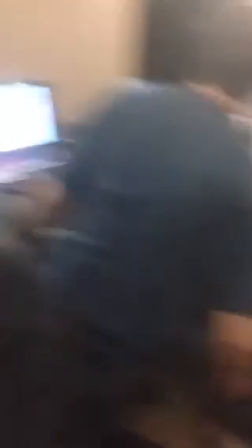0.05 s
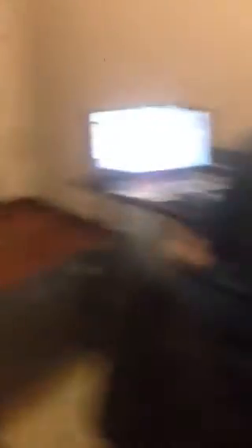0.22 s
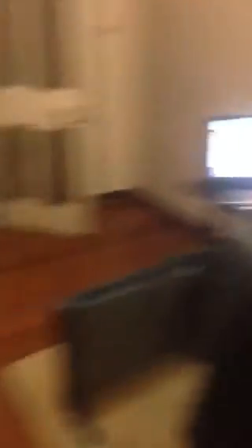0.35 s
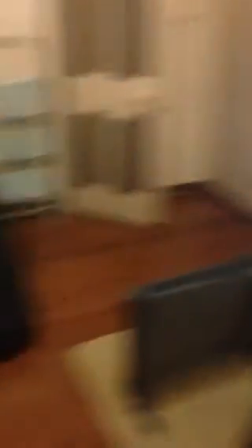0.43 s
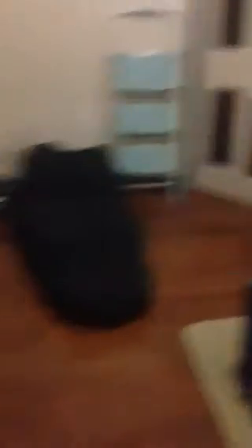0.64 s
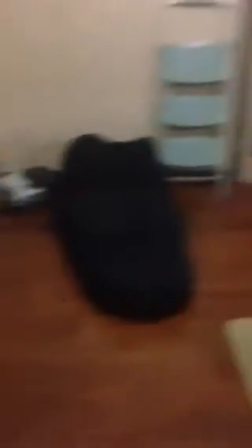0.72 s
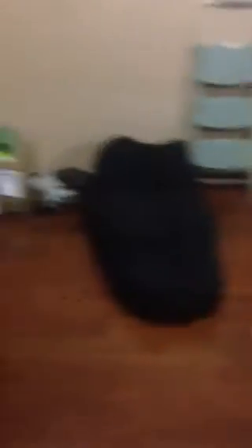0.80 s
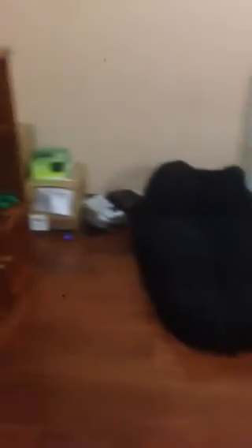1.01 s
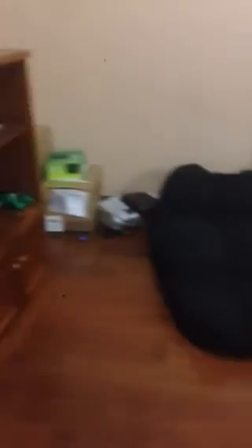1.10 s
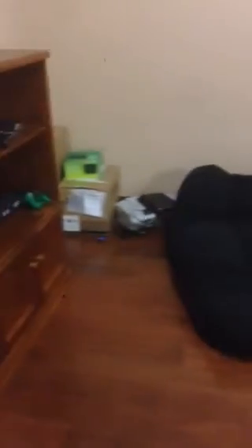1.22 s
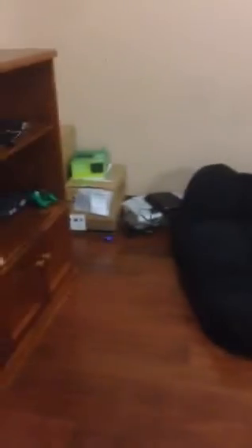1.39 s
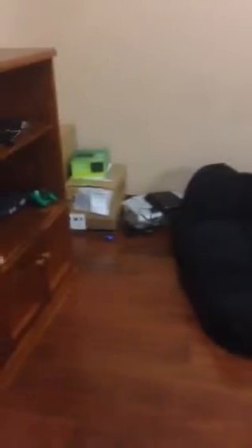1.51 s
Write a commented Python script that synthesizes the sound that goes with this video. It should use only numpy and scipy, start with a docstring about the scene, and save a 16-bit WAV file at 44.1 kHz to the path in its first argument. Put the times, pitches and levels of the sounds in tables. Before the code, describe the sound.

Hard knocks on wood, then a small object bouncing twice on a wooden floor.

```python
"""A bare room with a wooden floor, heard through one microphone. Three hard knocks sound on wood,
the last hollow and rattling; a small hard object then bounces twice with bright clicks. Duller taps come
from farther off, with soft thuds like footfalls, over faint room noise; early on, the microphone's case
is lightly bumped. Every contact is very short: most of what one hears is the room ringing after it."""
import sys
import numpy as np
from scipy import signal
from scipy.fft import rfft, irfft, next_fast_len
from scipy.io import wavfile
from scipy.ndimage import uniform_filter1d

SR = 44100
rng = np.random.default_rng(int(sys.argv[2]) if len(sys.argv) > 2 else 0)


def inscribe(sig):
    """Save sig as 16-bit PCM at rate SR to the path in sys.argv[1].

    A 1-D sig is mono; a 2-D sig holds one channel per row.
    Samples are clipped to [-1, 1] before scaling.
    """
    pcm = np.round(np.clip(np.atleast_2d(sig).T, -1, 1) * 32767)
    wavfile.write(sys.argv[1], SR, pcm.astype(np.int16))


N = 68355

# the floor's low answer to a bounce or a tap: frequency_hz, level_db
FLOOR_SPECTRUM = [(40, -28.5), (130, -17), (400, -12.5), (580, -15.5), (740, -34), (1400, -39), (5000, -66)]
PIVOT_HZ = 5100  # spectral tilts turn about this frequency


def knocks():
    """Hard blows on wood: each has a body, a crack, a bright resonance and ringing modes."""
    # the last four blows make one rattling knock: start_s, body_db, low_edge_hz, high_edge_hz,
    # crack_db, tilt_db_per_octave, bright_db, direct_db, board_db, hollow_db
    blows = [(0.202, 9, 256, 1530, 3.5, -2.5, -27, -17, -40.5, -73),
             (.3075, 18, 105.4, 1008, 4, 0, 8.5, -12.5, -31.5, -67),
             (.566, 2, 172, 556, -2, -3.5, 4, -13.5, -73, -36),
             (0.5711, -12, 227, 2360, 0, 5, -17, 0, -81, -55),
             (.577, -16, 298, 2300, -7.5, -3.5, -6, 0, -56, -65),
             (.614, 0.5, 200, 544, -23, -10, -26, -6, -69, -36.5)]
    # the crack of the wood: frequency_hz, level_db
    crack_spectrum = [(100, -29.5), (700, -6), (1650, -3), (2150, -1), (2700, -12), (3400, -3.5),
                      (4400, -4), (7300, -4.5), (10000, -12), (12500, -13), (15000, -25)]
    # modes of the boards and of a hollow wooden body: pitch_hz, level_db, t60_s
    board_modes = [(158.3, 3, 0.29), (190, -1.5, 0.4), (336, -2, 0.19), (494, 1.5, 0.41), (566.5, -2, 0.27),
                   (734, -6, 0.15), (718, -21, 0.57), (1010, -16, 0.43), (967, 1, 0.21), (2880, -10, 0.37),
                   (3542, -7, 0.24), (3650, -8, 0.47)]
    hollow_modes = [(188.5, -14, 0.44), (251.4, -5.5, 0.27), (408.5, 3, 0.33), (432.4, 5.5, 0.18),
                    (609.6, -5, 0.32), (1326, -6, 0.13), (2050, -9, 0.26), (2640, -4, 0.081),
                    (7050, -4.5, 0.09)]
    bright_hz, half_width_octaves = 2820, 0.44
    out, f = np.zeros(N), grid() + 1
    for s, body_db, low_hz, high_hz, crack_db, tilt, bright_db, direct_db, board_db, hollow_db in blows:
        body = amp(body_db) / np.hypot(1, (f / high_hz) ** 6)
        crack = shape(crack_spectrum) * amp(crack_db + tilt * np.log2(f / PIVOT_HZ))
        bright = amp(bright_db) / np.hypot(1, (np.log2(f / bright_hz) / half_width_octaves) ** 4)
        low_cut = 1 / np.hypot(1, (low_hz / f) ** 5.1)
        strike = contact(np.sqrt(body ** 2 + crack ** 2 + bright ** 2) * low_cut, direct_db)
        boards = amp(board_db) * ring(board_modes, low_hz)
        hollow = amp(hollow_db) * ring(hollow_modes)
        add(out, s, strike + boards + hollow)
    return out


def bounces():
    """A small object clicks on the floor and rings faintly; each contact has its own brightness."""
    # its contacts with the floor: start_s, level_db, direct_db, weight_db, tilt_db_per_octave
    landings = [(0.7946, 2, -8, -25, 3.5), (0.799, 5.5, -7.5, 3.5, -1.17), (0.946, -20.5, -6.5, 26, 9),
                (1.064, -1, -8.5, 3.5, -0.6)]
    # its click: frequency_hz, level_db
    click_spectrum = [(100, -33), (900, -9.5), (1400, -3.5), (2100, -4.5), (2800, -7.5), (3700, 0),
                      (5500, -1), (6900, -1), (8000, -8), (10500, -13.5), (12500, -22.5), (15000, -27)]
    # its modes: pitch_hz, level_db, t60_s
    object_modes = [(1324, -43.5, 0.28), (1416, -48, 0.26), (1690, -80, 0.17), (3660, -51.5, 0.5),
                    (4100, -61, 0.42), (4240, -52, 0.22), (5400, -41, 0.14), (5515, -45, 0.22),
                    (5797, -44, 0.18), (6800, -46, 0.4)]
    out = np.zeros(N)
    for s, db, direct_db, weight_db, tilt in landings:
        click = shape(click_spectrum) * amp(tilt * np.log2((grid() + 1) / PIVOT_HZ))
        gain = np.hypot(click, amp(weight_db) * shape(FLOOR_SPECTRUM))
        add(out, s, amp(db) * (contact(gain, direct_db) + amp(-4.5) * ring(object_modes)))
    return out


def distant_taps():
    """Duller contacts farther from the microphone: a tick, weight on the floor and a faint ring."""
    # the taps: start_s, level_db, weight_db, direct_db, ring_db
    taps = [(.001, -10.5, -3, -12, -71), (1.315, -4.5, 7.5, -18, -75), (1.4026, -1.5, 12, -10, -51),
            (1.441, -6.5, -1, -8, -85), (1.482, -23, -13, 4, -77)]
    # their dull tick: frequency_hz, level_db
    tick_spectrum = [(100, -22), (750, -6), (1100, -5), (1500, -3.5), (2100, -1), (2700, -6.5),
                     (3200, -7.5), (4500, -14.5), (7000, -26.5), (14000, -39)]
    # modes of the tapped thing: pitch_hz, level_db, t60_s
    tapped_modes = [(119.5, -1.5, 0.73), (292, 2.5, .45), (436, -2, 0.35), (545, -0.5, 0.36),
                    (1450, 1.5, 0.28), (1930, 10, 0.13), (2139, -2, 0.26), (3330, 10, 0.083)]
    out = np.zeros(N)
    for s, db, weight_db, direct_db, ring_db in taps:
        gain = np.hypot(shape(tick_spectrum), amp(weight_db) * shape(FLOOR_SPECTRUM))
        add(out, s, amp(db) * contact(gain, direct_db) + amp(ring_db) * ring(tapped_modes))
    return out


def footfalls():
    """Soft weight on the floor gives low thuds, heard mostly by way of the room."""
    # the steps: start_s, level_db
    steps = [(0.124, -6), (0.309, 9), (0.658, -1.5), (1.147, 9), (1.185, 5.5), (1.408, 0)]
    # their thud: frequency_hz, level_db
    thud_spectrum = [(25, -14), (60, -8), (95, -1.5), (150, -12.5), (300, -16), (600, -29), (2000, -48),
                     (8000, -61)]
    # the floor's lowest mode: pitch_hz, level_db, t60_s
    joist_modes = [(91, -58.5, 0.21)]
    out = np.zeros(N)
    for s, db in steps:
        thud = contact(shape(thud_spectrum), direct_db=-12)
        add(out, s, amp(db) * (thud + ring(joist_modes)))
    return out


def microphone_bump(start_s=0.081, level_db=-7):
    """A light touch right on the microphone's case, so it carries no room sound."""
    # the case's response: frequency_hz, level_db
    case_spectrum = [(30, -27), (110, 2.5), (250, -15.5), (550, 0), (900, -13), (2500, -28), (8000, -41)]
    out = np.zeros(N)
    add(out, start_s, coloured([amp(level_db)], shape(case_spectrum)))
    return out


def ring(modes, low_hz=20):
    """Struck modes swell as the room fills, then decay; those under low_hz are barely excited."""
    t = np.arange(N) / SR
    rise_s = 0.0056
    waves = np.zeros(N)
    for hz, db, t60_s in modes:
        strength = amp(db) / np.hypot(1, (low_hz / hz) ** 4)
        waves += strength * amp(-60 * t / t60_s) * np.sin(2 * np.pi * (hz * t + rng.random()))
    return waves * (1 - np.exp(-t / rise_s))


def contact(gain, direct_db):
    """One blow as it reaches the microphone: direct click, wall echoes and a dense tail."""
    # first echoes off the walls: delay_s, level_db
    wall_echoes = [(.0067, -21.5), (.0108, -19.5), (0.012, -19.5), (0.0165, -19), (.022, -33.5)]
    scatter_s = 0.0005  # their delays differ from spot to spot
    contact_s = 0.001221  # the click is spread over this time, treble first
    f = grid()
    lag_s = contact_s * (1 - f / f[-1])
    click = irfft(np.exp(-2j * np.pi * np.cumsum(lag_s) * f[1]))[:N]
    at_microphone = room_tail() + amp(direct_db) * click
    for delay_s, db in wall_echoes:
        add(at_microphone, delay_s + scatter_s * rng.standard_normal(), amp(db) * click)
    return coloured(at_microphone, gain)


def room_tail():
    """The bare room's echoes start as single spikes, thicken, and die sooner in the treble."""
    # the room's decay: frequency_hz, t60_s
    decay_times = [(60, 0.46), (150, 0.5), (500, 0.56), (1500, 0.47), (4000, 0.4), (7000, 0.34),
                   (10000, 0.3), (15000, 0.29)]
    build_s, mixing_s, spiky_db = 0.0039, 0.018, 8.5
    even_hz = 95  # the room is evenly loud over bands this wide
    t = np.arange(N) / SR
    spread = np.log(amp(spiky_db)) * np.exp(-t / mixing_s)
    signs = rng.choice([-1, 1], N)
    sizes = np.exp(spread * np.clip(rng.standard_normal(N), -2, 2) - spread ** 2 / 2)
    hz, s, frames = signal.stft(signs * sizes, SR, nperseg=256)
    decay = amp(-60 * s / along(decay_times, hz)[:, None])
    tail = signal.istft(frames * decay, SR, nperseg=256)[1][:N]
    m = 2 * next_fast_len(N)
    spectrum = rfft(tail, m)
    band_power = uniform_filter1d(np.abs(spectrum) ** 2, size=round(even_hz * m / SR))
    tail = irfft(spectrum / np.sqrt(np.abs(band_power)), m)[:N]
    tail *= 1 - np.exp(-t / build_s)
    return tail / np.linalg.norm(tail)


def room_tone():
    """Steady room noise under a faint low rustle that drops early, then slowly grows back."""
    # the steady noise and the rustle: frequency_hz, level_db
    air_spectrum = [(25, -68.5), (100, -64.5), (300, -69.5), (600, -60), (1500, -68.5), (4000, -61.5),
                    (8000, -66.5), (15000, -69.5)]
    rustle_spectrum = [(40, -58), (150, -45), (400, -50), (800, -59), (2000, -58.5), (10000, -75)]
    # the rustle's fall and rise: time_s, gain_db
    rustle_levels = [(0, 2.5), (.18, -8), (.9, -4), (1.099, -2), (1.272, 3), (1.55, -1)]
    air = coloured(rng.standard_normal(N), shape(air_spectrum))
    rustle = coloured(rng.standard_normal(N), shape(rustle_spectrum))
    gain_db = np.interp(np.arange(N) / SR, *np.transpose(rustle_levels))
    return air + amp(gain_db) * rustle


def amp(db):
    """Decibels to gain."""
    return 10 ** (np.asarray(db) / 20)


def along(points, hz):
    """Interpolate (frequency_hz, value) points on a log frequency axis."""
    f, values = np.transpose(points)
    return np.interp(np.log(hz + 1), np.log(f + 1), values)


def grid():
    """The frequencies on which filter gains are drawn."""
    return np.fft.rfftfreq(2 * next_fast_len(N), 1 / SR)


def shape(points):
    """Gain on the grid from (frequency_hz, level_db) points."""
    return amp(along(points, grid()))


def coloured(x, gain):
    """x through a causal, minimum-phase filter of the given gain."""
    cepstrum = irfft(np.log(np.maximum(gain, 1e-6)))
    m = len(cepstrum)
    cepstrum[1:m // 2] *= 2
    cepstrum[m // 2 + 1:] = 0
    return irfft(rfft(x, m) * np.exp(rfft(cepstrum)), m)[:N]


def add(out, start_s, x):
    """Mix x into out from start_s on."""
    i = max(0, round(start_s * SR))
    out[i:] += x[:N - i]


def scene():
    """All sources at one microphone in the room."""
    return (knocks() + bounces() + distant_taps() + footfalls() + microphone_bump() + room_tone())[None]


def record(dry):
    """The recorder keeps nothing above its band limit."""
    f, top_hz = grid(), 15500
    return irfft(rfft(dry, 2 * (len(f) - 1)) * (f < top_hz))[:, :N]


dry = scene()
out = record(dry)
inscribe(out)
```